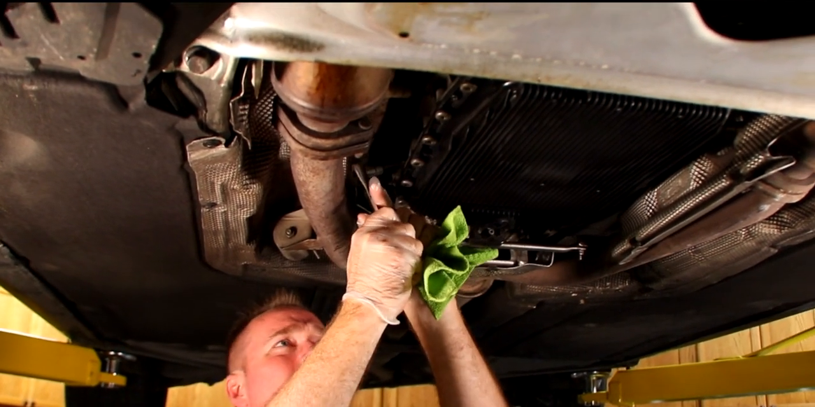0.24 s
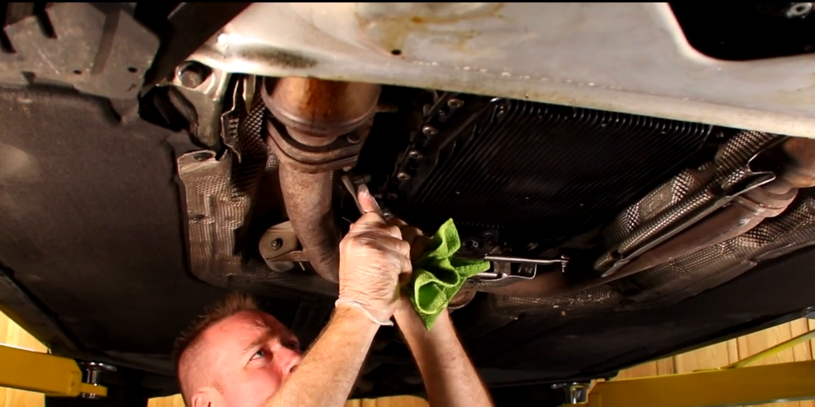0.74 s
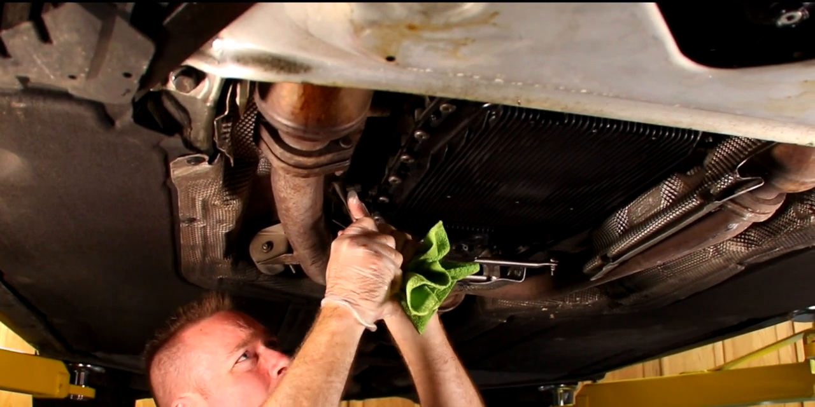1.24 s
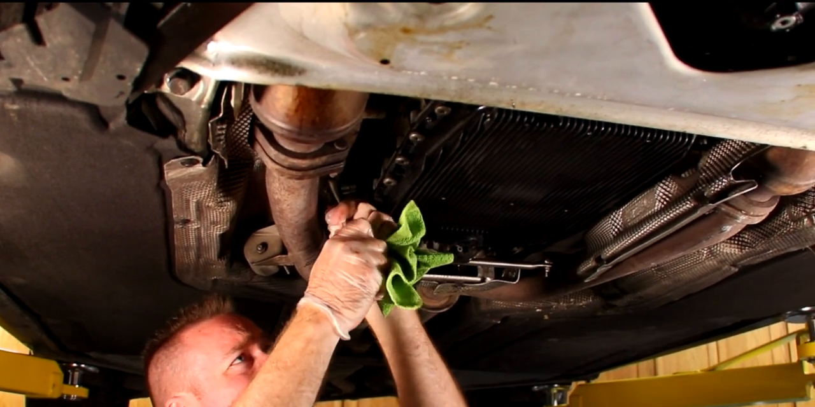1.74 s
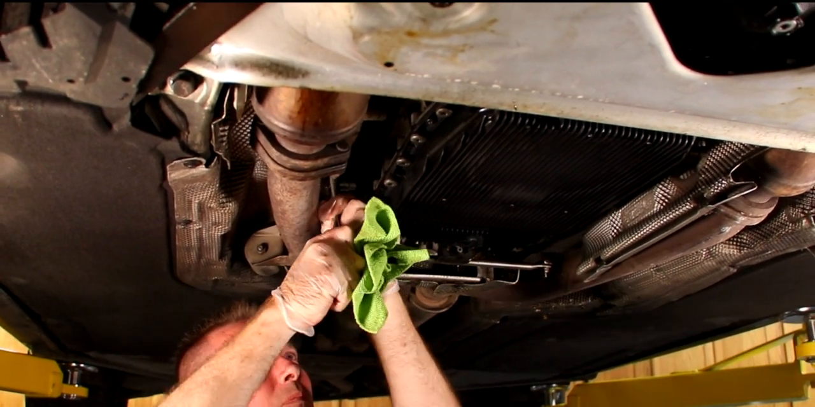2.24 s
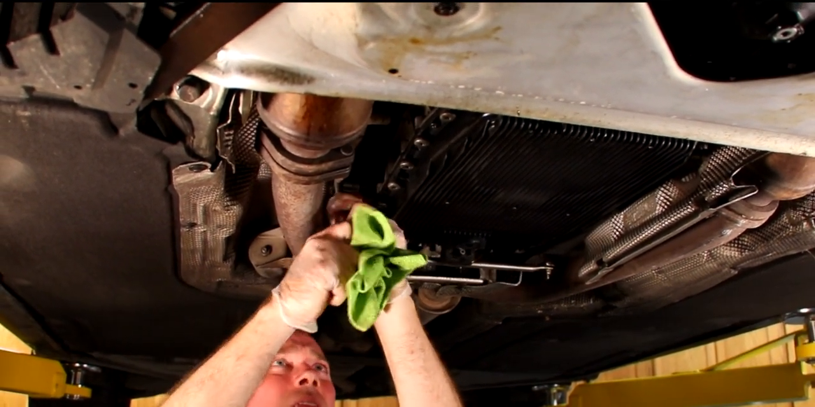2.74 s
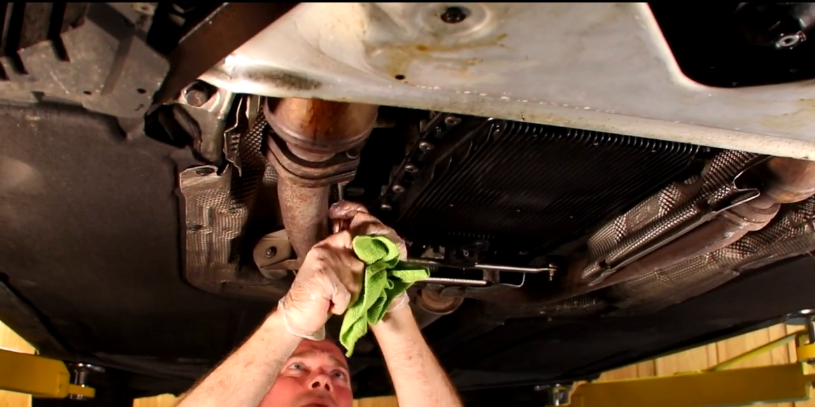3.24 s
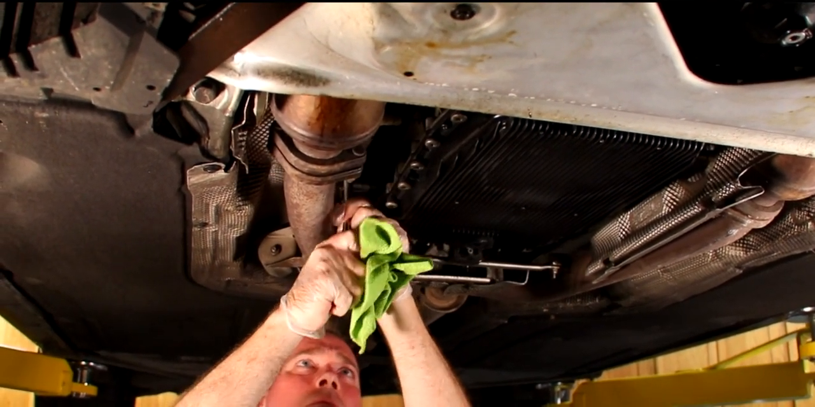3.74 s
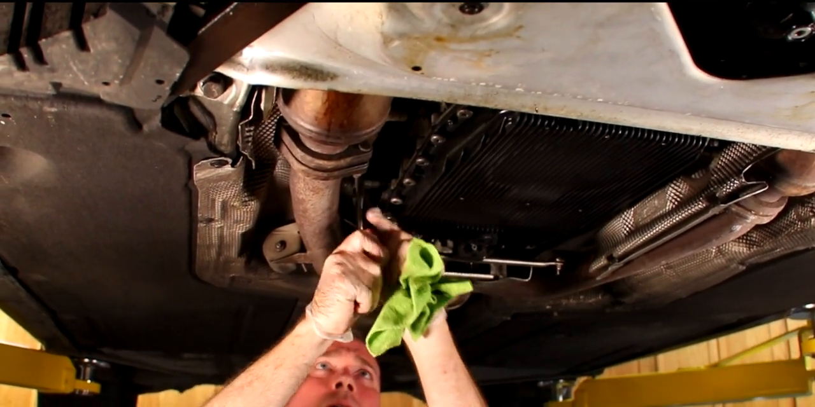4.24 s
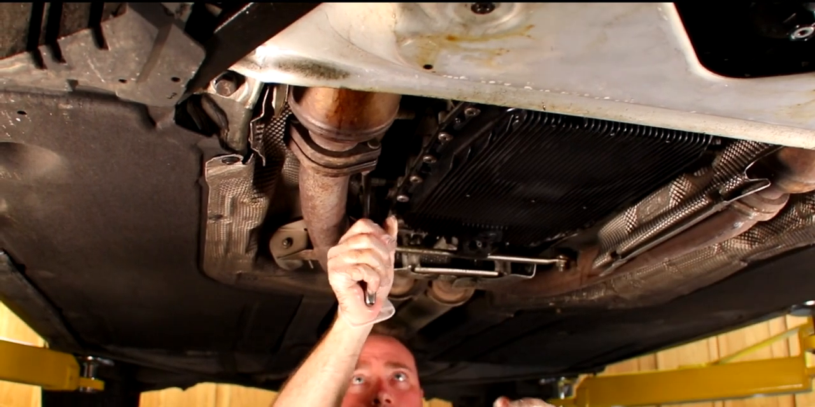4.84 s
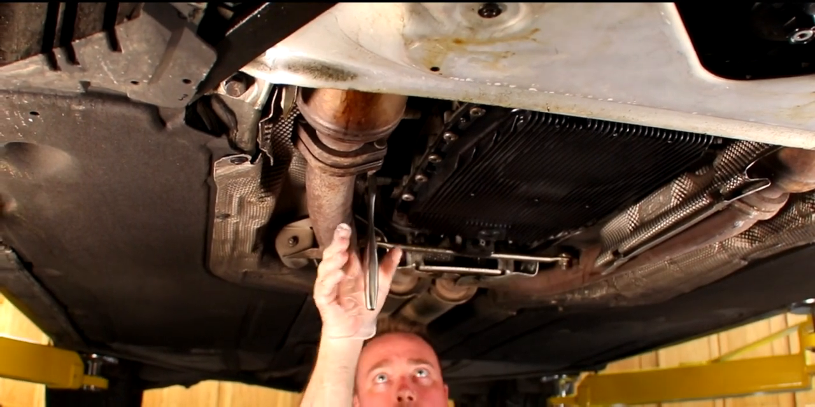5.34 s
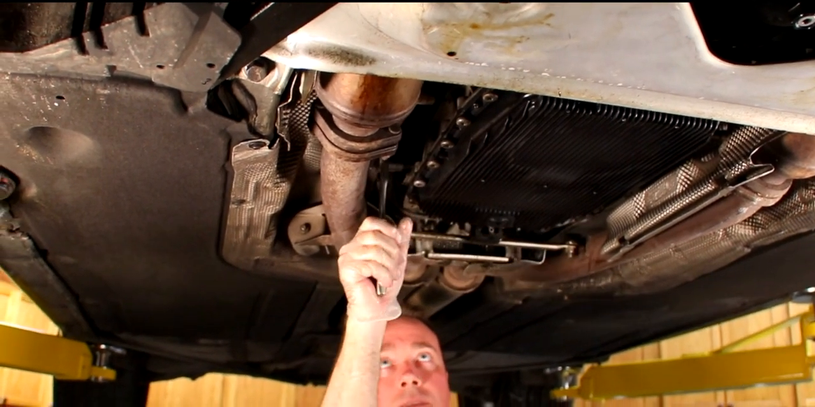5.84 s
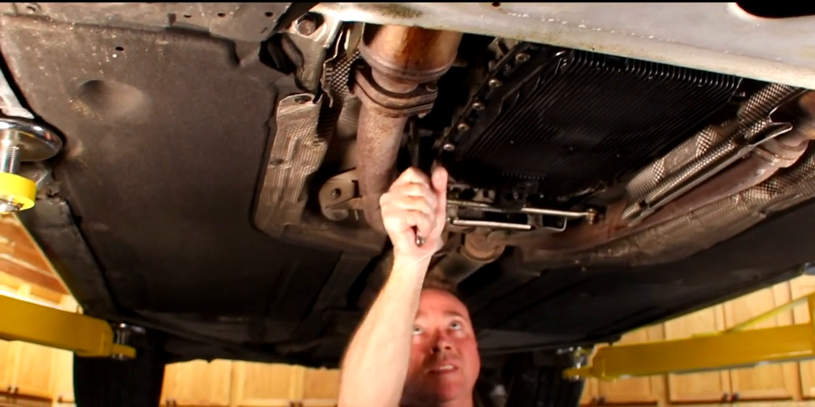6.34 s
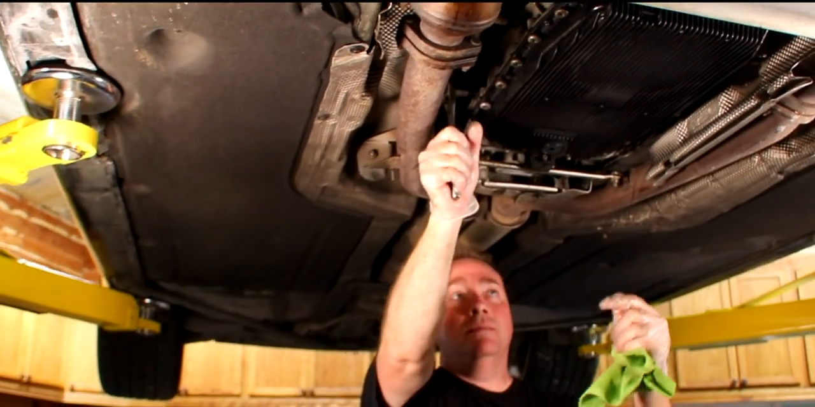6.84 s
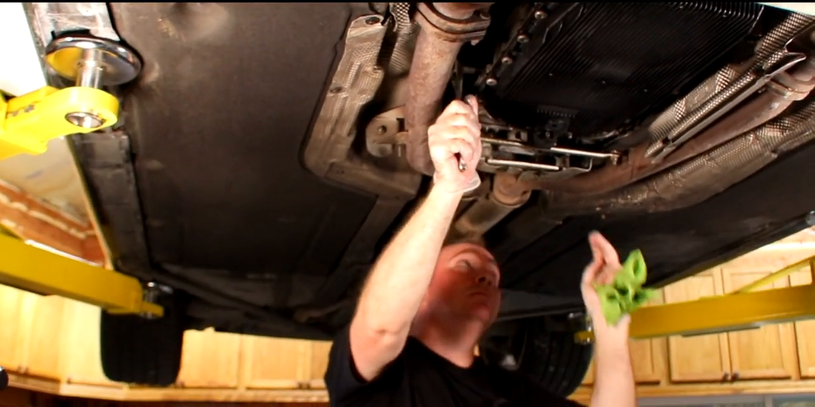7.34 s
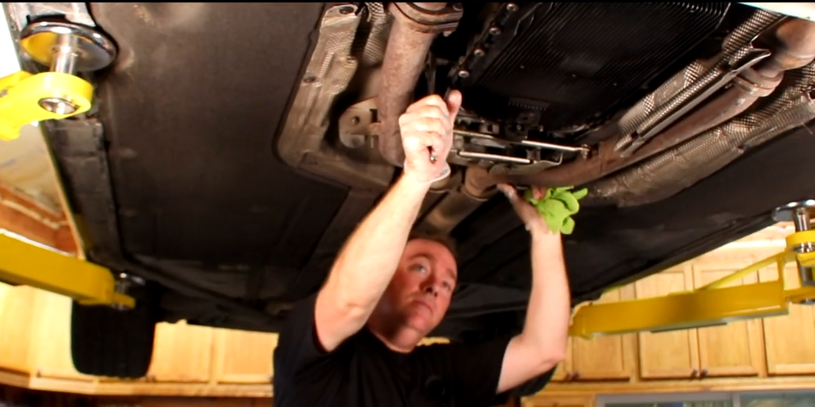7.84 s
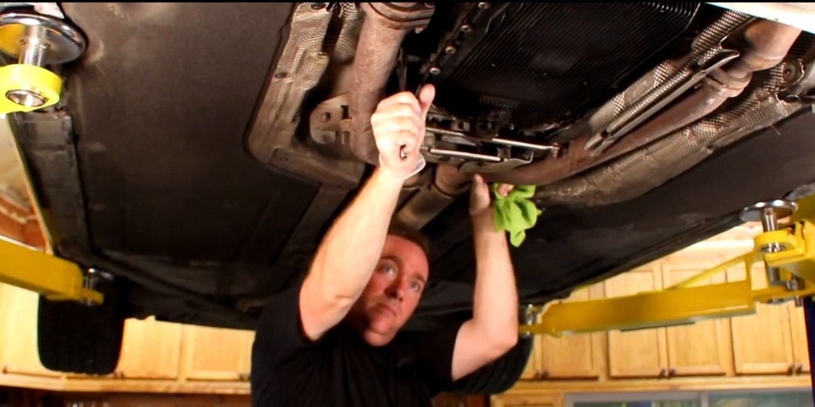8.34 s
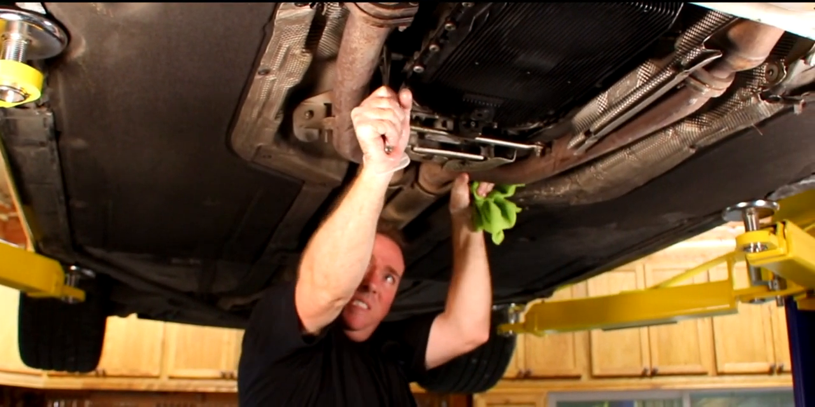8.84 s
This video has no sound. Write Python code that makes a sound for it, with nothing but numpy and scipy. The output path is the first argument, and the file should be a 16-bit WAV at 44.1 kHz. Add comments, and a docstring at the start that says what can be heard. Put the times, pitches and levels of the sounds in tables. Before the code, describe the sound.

Close, uneven metallic taps and ticks come from a hex key knocking on a plug in a hollow car casing, some single, some in quick clusters. Quiet scraping and cloth rustle fill the gaps. Past the middle the key gives a bright, damped ping, and near the end a clear ringing clink followed by a gritty drag. A faint hum and hiss of the garage lie underneath.

```python
"""A garage, under a raised car: a hex key is fitted to a tight plug and worked against it.
Each contact is a short gritty burst that knocks the hollow casing, rings the hand-damped steel key
and ticks. Gloves, rag and key rub in between, with faint squeaks and the soft thumps of shifting
weight. Twice the key slips in the grip: first a bright, choked ping, later an open ring.
Short reflections, the room's hum and a faint hiss surround the work."""
import sys
import numpy as np
from scipy import signal
from scipy.fft import rfft, irfft
from scipy.io import wavfile
from scipy.ndimage import uniform_filter1d

SR = 44100
rng = np.random.default_rng(int(sys.argv[2]) if len(sys.argv) > 2 else 0)


def int16_out(signal):
    """Quantize to a 16-bit WAV file."""
    q = np.round(np.clip(np.atleast_2d(signal).T, -1, 1) * 32767)
    wavfile.write(sys.argv[1], SR, q.astype(np.int16))


N = 400869


def from_db(db):
    return 10 ** (np.asarray(db) / 20)


def rms_one(x):
    return x / np.sqrt(np.mean(x ** 2) + 1e-20)


def add(out, start_s, sound):
    out[round(start_s * SR):][:len(sound)] += sound


def band(x, low_hz, high_hz):
    return signal.sosfilt(signal.butter(2, [low_hz, high_hz], "band", fs=SR, output="sos"), x)


def coloured(x, spectrum):
    """Shapes a white signal with an EQ curve; rms 1."""
    hz, db = np.transpose(spectrum)
    bin_hz = np.maximum(np.arange(len(x) // 2 + 1) * SR / len(x), 1)
    gain = from_db(np.interp(np.log(bin_hz), np.log(hz), db))
    return rms_one(irfft(rfft(x) * gain, len(x)))


def drift(rate_hz):
    """A random wander, gliding between points of spread 1."""
    knots = rng.standard_normal(int(N / SR * 60))
    return np.interp(np.arange(N) / SR * rate_hz, np.arange(len(knots)), knots)


def grit(size, roughness_db):
    """Dense clicks of uneven size and random sign."""
    return from_db(roughness_db * np.minimum(rng.exponential(1, size), 4)) * rng.standard_normal(size)


def ring(modes, t, extra_db=0, damping_t60=9):
    """A struck body as decaying sines; a grip adds its damping to every mode."""
    hz, db, t60 = np.transpose(modes)[:, :, None]
    fall = np.log(1000) * (1 / t60 + 1 / damping_t60)
    return np.sum(from_db(db + extra_db) * np.exp(-fall * t) * np.sin(2 * np.pi * hz * t), axis=0)


def octaves(modes, above_hz=4000):
    """Height of each mode in octaves, for tilting the tone."""
    return np.log2(np.array(modes)[:, :1] / above_hz)


# EQ of the room tone. Each row: frequency in Hz, relative level in dB.
ROOM_EQ = [(15, -50), (25, -2), (108, 23.5), (394, -19), (575, -9), (1700, -47), (2160, 3), (3250, -14),
           (6210, -18.5), (14800, -4.5), (16000, 7)]


def room_tone():
    """A low, noisy hum with a thin hiss on top; the level wavers slightly."""
    return from_db(-62.5 + 1.2 * drift(8.6)) * coloured(rng.standard_normal(N), ROOM_EQ)


# EQ of the stereo hiss. Each row: frequency in Hz, relative level in dB.
SIDE_EQ = [(15, 10), (25, -8), (326, -5), (2280, -16.5), (3160, -16.5), (14400, -3), (16000, -31)]


def side_hiss(mid):
    """A faint hiss for width that grows with the level in the centre."""
    lift = 1 + 10 * uniform_filter1d(np.abs(mid), size=1024)
    return from_db(-78) * coloured(rng.standard_normal(N), SIDE_EQ) * lift


# The steel key's modes. Each row: frequency in Hz, level in dB, t60 in seconds.
KEY_MODES = [(1700, -14, .1), (1870, -4, .16), (2051, -3, .22), (2177, -5, .16), (2347, -2, .17),
             (2477, -3, .24), (2806, -4, .13), (3405, -5, .28), (4152, -5, .35), (4328, -12, .35),
             (5319, -4, .33), (5547, -7, .45), (6700, -10, .3), (7787, -5, .2), (8400, -12, .22),
             (11650, -20, .12)]


def key_singing():
    """Friction excites the key's upper modes; each swells and fades as the fingers shift."""
    t, friction = np.arange(SR // 16) / SR, grit(N, 2.5)
    out = np.zeros(N)
    for mode in KEY_MODES[7:15]:
        voice = signal.oaconvolve(friction, ring([mode], t, damping_t60=0.005))[:N]
        out += from_db(5 * drift(7)) * rms_one(voice)
    return rms_one(out)


def swell(start_s, ms):
    """Power envelope of one stroke: soft rise, hold, soft fall."""
    t, edge = np.arange(N) / SR, 0.3 * ms / 1000
    rise, fall = t - start_s + edge, start_s + ms / 1000 + edge - t
    return np.clip(np.minimum(rise, fall) / (2 * edge), 0, 1) ** 2


def rub_power(rumble_db, hiss_db):
    """Powers of rumble, scrape and hiss; the scrape rides just under the mean level of the others."""
    scrape_db = (rumble_db + hiss_db) / 2 - 3.5
    return from_db([rumble_db, scrape_db, hiss_db]) ** 2


# A steady bed of fidgeting. Each row: time in seconds, casing rumble in dB, cloth hiss in dB.
FIDGETING = [(0.0, -57, -63), (0.35, -65.5, -67.5), (0.81, -68.5, -74), (1.2, -61.5, -67), (1.8, -59, -59),
             (2.1, -64, -70), (2.6, -67, -67.5), (2.9, -58.5, -65.5), (3.87, -60.5, -74.5),
             (4.2, -64, -63.5), (5.34, -70.5, -70), (5.6, -64.5, -63.5), (6.28, -63.5, -66),
             (6.43, -58.5, -64), (6.86, -69.5, -67), (7.29, -59.5, -61.5), (7.95, -59.5, -58.5),
             (8.4, -59, -64.5), (9.09, -63, -68)]
# Short swipes of glove, rag or key.
# Each row: start in seconds, length in ms, casing rumble in dB, cloth hiss in dB.
HAND_SWIPES = [(0, 49, -53.5, -52), (0.3, 53, -55.5, -81), (0.57, 51, -50.5, -91), (0.673, 68, -45.5, -65),
               (1.02, 95, -51, -68), (1.252, 82, -48, -59.5), (1.37, 105, -49.5, -62), (1.46, 82, -63, -57),
               (1.551, 112, -77, -52), (1.76, 79, -51.5, -51), (1.84, 48, -71, -55),
               (1.88, 130, -53.5, -61), (2.37, 51, -72, -61.5), (2.46, 56, -59, -73),
               (2.594, 76, -59, -52.5), (2.74, 96, -49.5, -58.5), (2.88, 31, -79, -60),
               (2.99, 34, -57, -63), (3.16, 64, -58, -71), (3.211, 68, -60.5, -55.5),
               (3.75, 160, -57, -55.5), (4.1, 170, -88, -61.5), (4.29, 37, -69, -59),
               (5.001, 95, -55.5, -66), (5.348, 100, -81.5, -60), (5.49, 26, -57.5, -70),
               (5.861, 94, -51, -61), (5.918, 39, -62, -47.5), (5.99, 73, -58, -71), (6.26, 160, -52, -56),
               (6.7, 62, -63.5, -66), (6.82, 44, -63.5, -55), (7.2, 91, -57.5, -57.5),
               (7.592, 36, -47, -49), (7.656, 22, -54.5, -48.5), (7.691, 19, -61, -51),
               (7.73, 37, -74, -54), (7.849, 60, -51, -58), (7.97, 130, -62, -49.5), (8.09, 20, -54, -77),
               (8.46, 216, -49.5, -54.5), (8.894, 55, -47, -61)]
# The key drags and crackles over bare steel. Each row: start in seconds, length in ms, level in dB.
KEY_DRAGS = [(0.3, 360, -64), (0.681, 62, -55), (1.55, 130, -51), (8.42, 325, -49)]


def rub_pressure():
    """Gains of rumble, scrape and hiss: the bed plus a swell for each swipe and drag."""
    times, *levels = np.transpose(FIDGETING)
    power = rub_power(*[np.interp(np.arange(N) / SR, times, db) for db in levels])
    for start_s, ms, rumble_db, hiss_db in HAND_SWIPES:
        power += rub_power(rumble_db, hiss_db)[:, None] * swell(start_s, ms)
    power[1] += sum(from_db(db) ** 2 * swell(start_s, ms) for start_s, ms, db in KEY_DRAGS)
    return np.sqrt(power)


# The casing's low thud and hollow ring. Each row: frequency in Hz, level in dB, t60 in seconds.
THUD_MODES = [(167.5, -6.5, 0.72), (209.8, 13.5, 0.29), (245, -12.5, 0.2), (252, -10, 0.049),
              (307, -13, 0.072)]
CASING_MODES = [(358, -4.5, 0.3), (462, 4, 0.047), (494, 3.5, 0.35), (594, 8.5, 0.27), (669, 7, 0.13),
                (787, 4, 0.099), (858, 7, 0.14), (953, 9.5, 0.13), (1028, 7.5, 0.14), (1124, 10.5, 0.071),
                (1218, 7, 0.09), (1310, -4.5, 0.06)]
# EQ of glove and rag. Each row: frequency in Hz, relative level in dB.
CLOTH_EQ = [(1760, -22), (3000, -5), (3680, -7), (5220, -6), (8110, -6), (11900, -14), (16000, -23)]


def rubbing():
    """Sliding grit makes the damped casing rumble and the key scrape, under a hiss of glove and rag."""
    rumble_gain, scrape_gain, hiss_gain = rub_pressure()
    t = np.arange(SR // 8) / SR
    slip = drift(40)   # rumble and scrape flutter together
    casing = ring(THUD_MODES + CASING_MODES, t, damping_t60=0.013)
    key = ring(KEY_MODES[:9], t, -3 * octaves(KEY_MODES[:9]), damping_t60=0.007)
    rumble = band(signal.fftconvolve(grit(N, 3.2), casing)[:N], 130, 1400)
    scrape = band(signal.fftconvolve(grit(N, 4.5), key)[:N], 900, 6000)
    hiss = coloured(grit(N, 1.4), CLOTH_EQ) + from_db(-3) * band(key_singing(), 3000, 10000)
    return (rumble_gain * from_db(4.5 * slip) * rms_one(rumble)
            + scrape_gain * from_db(3.2 * slip) * rms_one(scrape)
            + hiss_gain * from_db(2.2 * drift(45)) * hiss)


def struck_bodies(t, push, centre_hz):
    """One burst of grit drives thud, casing and gripped key; mode strengths change with every blow."""
    spot_db = rng.normal(0, 2.5, (40, 1))
    near_db = -7 * np.abs(octaves(CASING_MODES, centre_hz))   # modes near the knock's pitch lead
    grip_db = -8.5 * octaves(KEY_MODES[:14])   # the hand dulls the upper modes most
    thud = ring(THUD_MODES, t, spot_db[:len(THUD_MODES)], damping_t60=0.1)
    casing = ring(CASING_MODES, t, near_db + spot_db[:len(CASING_MODES)], damping_t60=0.07)
    key = ring(KEY_MODES[:14], t, grip_db + spot_db[-14:], damping_t60=0.04)
    bodies = [band(thud, 60, 330), band(casing, 380, min(2.2 * centre_hz, 1600)), band(key, 1100, 8000)]
    burst = grit(len(t), 2) * push
    return signal.fftconvolve(bodies, burst[None, :4096], axes=1)[:, :len(t)]


# EQ of the bright tick. Each row: frequency in Hz, relative level in dB.
TICK_EQ = [(2350, -18.5), (4000, -9), (5280, -4.5), (8450, -12), (9890, -15.5), (11600, -19), (16000, -33)]
# The wash of sheet metal, pipes and shields behind casing, tick and key, in that order.
# Each row: level against the blow in dB, t60 in seconds.
METAL_WASH = [(-5, 0.17), (-17.5, 0.27), (-9.5, 0.26)]
# The key hits the plug.
# Each row: start in seconds, key peak in dB, body knock in dB, tick in dB, knock pitch in Hz.
KEY_HITS = [(0.064, -37.5, -71, -48.5, 1270), (0.1183, -61, -21, -39, 774),
            (0.2953, -15.5, -36, -36.5, 1150), (0.5255, -59, -30, -60, 970), (0.5891, -46.5, -43, -79, 340),
            (0.817, -49, -66, -83, 1300), (0.878, -53.5, -72, -78, 1300), (0.9697, -44, -38.5, -67.5, 320),
            (1.0972, -21, -38, -47.5, 626), (1.1403, -47, -42, -76, 710), (1.2044, -51, -59, -64, 600),
            (1.287, -22.5, -35, -40.5, 670), (1.711, -37, -37, -56, 620), (1.727, -26.5, -40.5, -46, 443),
            (1.9495, -16.5, -24.5, -31.5, 680), (2.0186, -46, -47.5, -74, 370),
            (2.1164, -56, -55, -73, 700), (2.1856, -52.5, -62, -77, 1300), (2.2668, -50, -60, -71, 1270),
            (2.775, -50, -47, -61, 300), (2.8104, -36.5, -27.5, -51, 524), (3.0752, -70, -55, -78, 343),
            (3.3476, -41.5, -46.5, -60, 635), (3.3715, -30, -25.5, -44, 930),
            (3.6983, -30.5, -28.5, -47, 720), (3.8583, -29, -24, -36, 874),
            (3.8738, -43, -20.5, -30.5, 1230), (3.8778, -13.5, -22, -59, 487),
            (3.919, -53, -60, -40.5, 400), (3.9554, -78, -44, -72, 604), (3.98, -35.5, -41.5, -52, 600),
            (4.0557, -58, -51, -79, 510), (4.1155, -44, -56, -62, 473), (4.2206, -59, -45, -55.5, 320),
            (4.277, -64, -52.5, -62, 1050), (5.0751, -41.5, -42.5, -62, 454),
            (5.4128, -38, -58.5, -50.5, 1050), (5.5985, -16.5, -34.5, -32.5, 494),
            (5.6104, -15.5, -32, -35, 690), (5.6184, -33, -26.5, -40, 450), (5.852, -72, -50, -78, 304),
            (5.913, -35, -38, -46.5, 322), (5.9192, -29.5, -38.5, -63, 1120), (5.935, -40, -35.5, -61, 476),
            (6.1194, -48, -48.5, -69, 330), (6.2684, -52, -46.5, -70, 483), (6.3081, -29, -42, -37.5, 910),
            (6.3469, -25, -32, -39.5, 354), (6.3504, -18.5, -27, -38, 940), (6.36, -43, -24, -41.5, 338),
            (6.493, -35.5, -39.5, -57, 395), (6.5547, -58, -44.5, -80, 397), (6.7104, -60, -44, -69, 486),
            (6.7514, -61, -45.5, -77, 357), (6.9715, -41, -75, -78, 780), (7.016, -33.5, -66, -83, 1000),
            (7.1269, -40, -41, -66, 417), (7.4245, -52, -43.5, -78, 288), (7.473, -54, -53, -55, 220),
            (7.6008, -38.5, -24, -60, 290), (7.7822, -43, -58, -74, 250), (7.8335, -37, -42, -57, 450),
            (8.0271, -6.5, -32, -25, 960), (8.2636, -38, -52, -57.5, 890), (8.423, -36, -53, -73, 1190),
            (8.5052, -29, -46, -66, 1200), (8.5957, -37, -54, -64, 1180), (8.641, -41, -49.5, -70, 1100),
            (8.6622, -59, -58, -52, 1190), (8.703, -60, -56, -63, 1190), (8.757, -34, -51, -72, 990),
            (8.8926, -55, -43, -66, 220), (8.9011, -29, -46, -62, 1200)]


def key_hits():
    """Each contact is a knock, a clink and a tick, trailed by a wash of the metal around them."""
    out, t = np.zeros(N + SR), np.arange(SR // 3) / SR
    attack = slice(SR // 70)   # levels are set on the first moments of the blow
    thud_top_hz, casing_foot_hz, tick_t60 = 296, 428, 0.011
    wash_db, wash_t60 = np.transpose(METAL_WASH)[:, :, None]
    wash_envelope = from_db(wash_db - 60 * t / wash_t60) * np.clip(t / 0.00089, 0, 1)
    for start_s, key_db, body_db, tick_db, pitch_hz in KEY_HITS:
        # High knocks lose thud; low ones lose casing ring and push for longer.
        thud_db = body_db - 13 * max(np.log2(pitch_hz / thud_top_hz), 0)
        casing_db = body_db - 14 * max(np.log2(casing_foot_hz / pitch_hz), 0)
        contact_s = 0.00447 * (600 / pitch_hz) ** 0.41
        centre_hz = max(pitch_hz, casing_foot_hz)
        push = t / contact_s * np.exp(-3 * t / contact_s)
        thud, casing, key = struck_bodies(t, push, centre_hz)
        sizzle = coloured(grit(len(t), 3.6), TICK_EQ)   # modes so dense they blur into noise
        tick = sizzle * signal.lfilter([1], [1, -from_db(-60 / SR / tick_t60)], push)
        clink = from_db(key_db) * key / np.abs(key).max()
        layers = (thud, thud_db), (casing, casing_db), (tick, tick_db)
        blow = clink + sum(from_db(db) * layer / np.std(layer[attack]) for layer, db in layers)
        noise = rng.standard_normal((2, len(t)))
        wash = [from_db(casing_db) * rms_one(band(noise[0], centre_hz * 0.5, centre_hz * 0.93)),
                from_db(tick_db) * sizzle,
                np.std(clink[attack]) * rms_one(band(noise[1], 1300, 4200))]
        add(out, start_s, blow + np.sum(wash * wash_envelope, axis=0))
    return out[:N]


# Weight shifts on feet and lift. Each row: start in seconds, level in dB, pitch in Hz.
WEIGHT_SHIFTS = [(2.803, -37.5, 116), (3.867, -42, 123), (4.677, -47.5, 94), (5.623, -40.5, 106),
                 (6.382, -40.5, 101), (7.129, -35.5, 133), (7.449, -48, 98)]


def thumps():
    """Shifting weight gives soft low pushes that swell and die within a few cycles."""
    out, t = np.zeros(N), np.arange(SR // 5) / SR
    envelope = np.e * t / 0.019 * np.exp(-t / 0.013)
    for start_s, db, hz in WEIGHT_SHIFTS:
        add(out, start_s, from_db(db) * envelope * np.sin(2 * np.pi * hz * t))
    return out


# Faint squeaks. Each row: start in seconds, length in ms, peak in dB.
GLOVE_SQUEAKS = [(2.94, 18, -58), (2.995, 39, -59), (3.575, 30, -72.5), (3.635, 37, -66.5)]


def glove_squeaks(pitch_hz=6140):
    """Glove on steel: short thin whistles that waver a little."""
    out = np.zeros(N)
    for start_s, ms, db in GLOVE_SQUEAKS:
        t = np.arange(round(ms / 1000 * SR)) / SR
        waver = np.cumsum(rng.normal(0, 0.03, len(t)))
        add(out, start_s, from_db(db) * np.hanning(len(t)) * np.sin(2 * np.pi * pitch_hz * t + waver))
    return out


# The key slips in the grip.
# Each row: start in seconds, level in dB, brightness in dB per octave, hand damping t60 in seconds.
KEY_SLIPS = [(6.307, -15, 40, 0.053), (8.0266, -9.5, 0, 2.3)]


def key_slips():
    """The loose key rings, each mode split in two by the bent shank and shaken by the socket's rattle."""
    out, t = np.zeros(N), np.arange(SR // 2) / SR
    twin_modes = np.array(KEY_MODES) * [0.991, 1, 0.8]   # slightly flat and shorter, so the pairs beat
    for start_s, db, brightness, hand_t60 in KEY_SLIPS:
        tilt_db = brightness * octaves(KEY_MODES)
        ping = ring(KEY_MODES, t, tilt_db, hand_t60) + 0.6 * ring(twin_modes, t, tilt_db, hand_t60)
        rattle_db = np.interp(t * 400, np.arange(210), rng.normal(0, 4, 210))
        add(out, start_s, from_db(db + rattle_db) * band(ping, 600, 15000) / np.abs(ping).max())
    return out


def garage_reverb(x, low_t60=0.4, treble_t60=0.51):
    """Dense reflections off floor, underbody and walls; the treble hangs on a little longer."""
    t = np.arange(SR // 2) / SR
    white = rng.standard_normal(len(t))
    low = signal.sosfilt(signal.butter(1, 2500, fs=SR, output="sos"), white)
    tail = low * from_db(-60 * t / low_t60) + (white - low) * from_db(-60 * t / treble_t60)
    tail *= np.clip(t / 0.013, 0, 1)
    return signal.fftconvolve(x, tail / np.sqrt(np.sum(tail ** 2)))[:N]


def scene():
    """Everything sits in the centre; only a faint hiss differs between the ears."""
    low_cut = signal.butter(4, 154, "high", fs=SR, output="sos")   # small parts radiate no deep bass
    handling = key_hits() + key_slips() + rubbing() + glove_squeaks()
    work = signal.sosfilt(low_cut, handling) + thumps()
    mid = work + room_tone() + from_db(-18.5) * garage_reverb(work)
    side = side_hiss(mid)
    return np.array([mid + side, mid - side])


def record(dry):
    """A steep high cut takes off the topmost air."""
    return signal.sosfilt(signal.cheby2(14, 60, 15900, fs=SR, output="sos"), dry)


dry = scene()
out = record(dry)
int16_out(out)
```